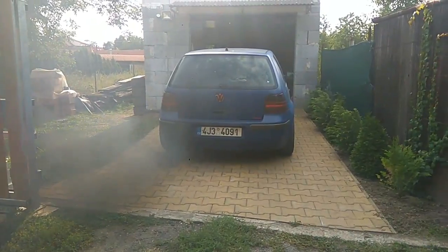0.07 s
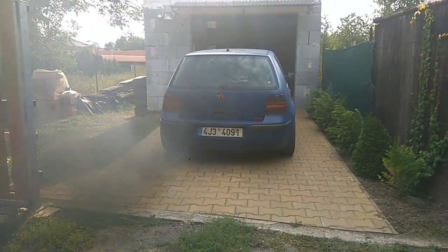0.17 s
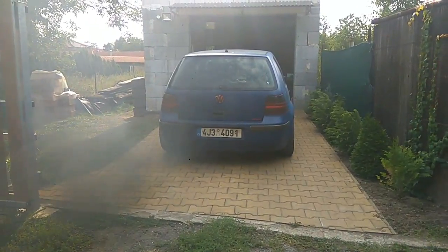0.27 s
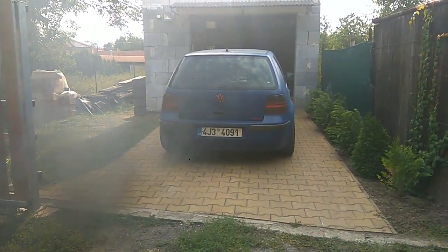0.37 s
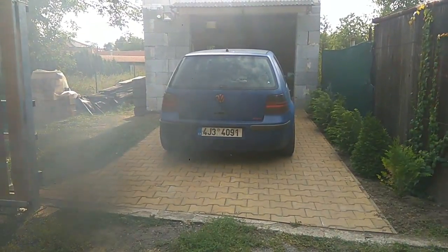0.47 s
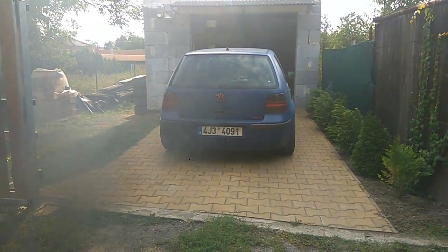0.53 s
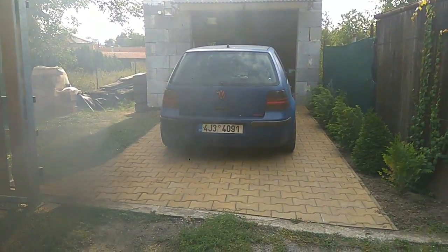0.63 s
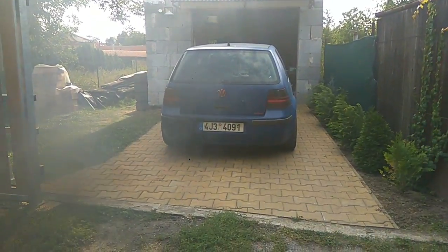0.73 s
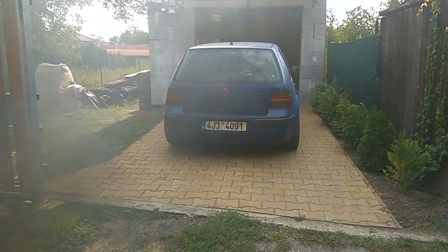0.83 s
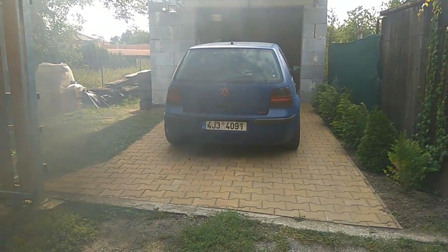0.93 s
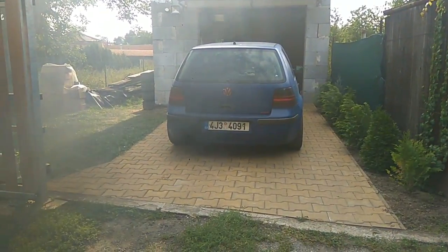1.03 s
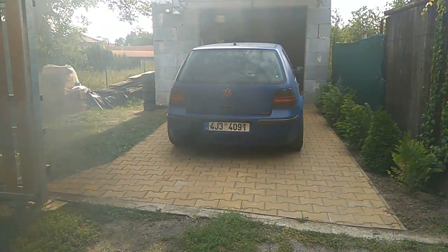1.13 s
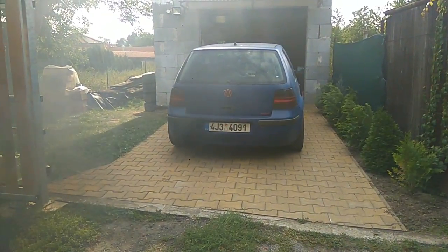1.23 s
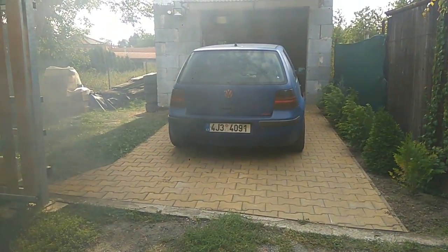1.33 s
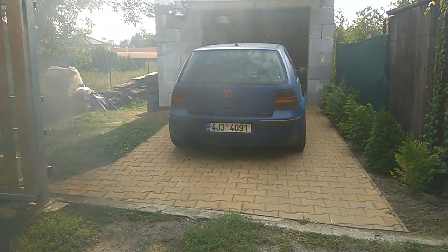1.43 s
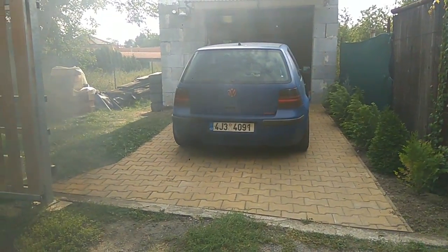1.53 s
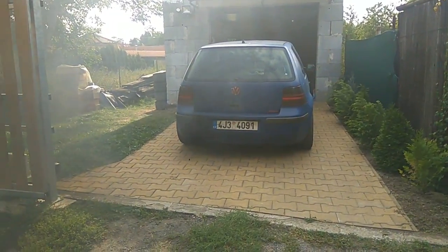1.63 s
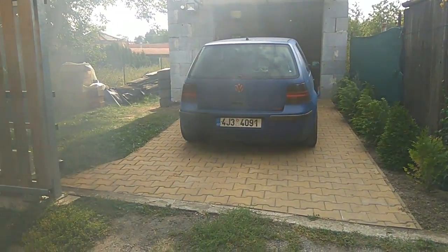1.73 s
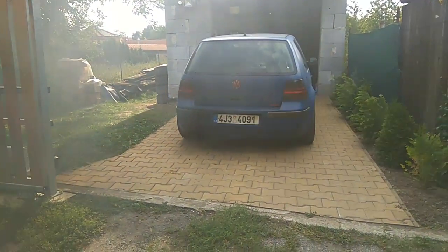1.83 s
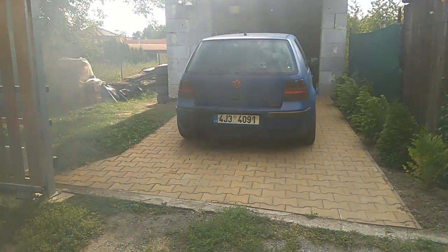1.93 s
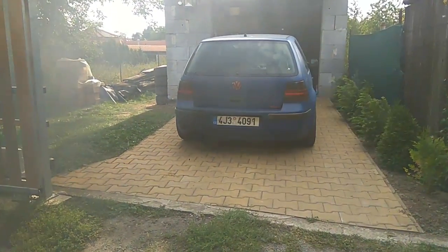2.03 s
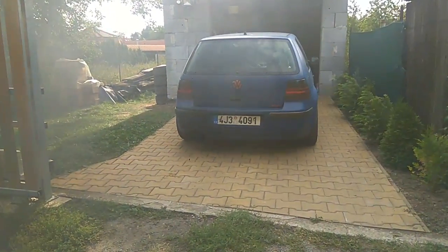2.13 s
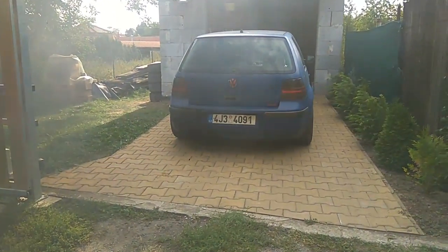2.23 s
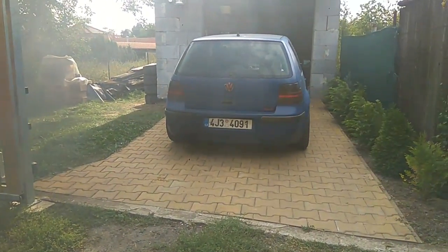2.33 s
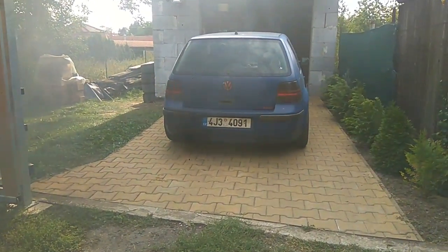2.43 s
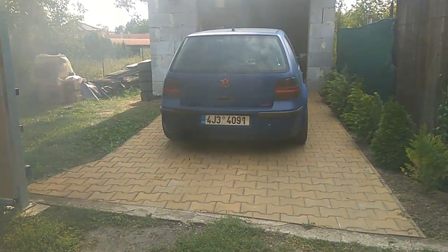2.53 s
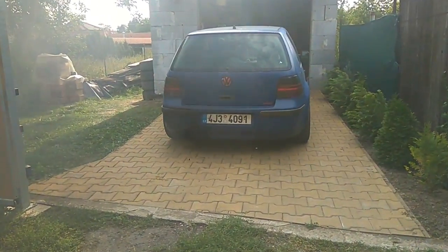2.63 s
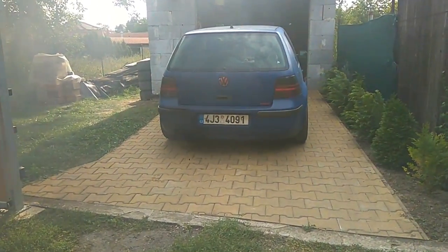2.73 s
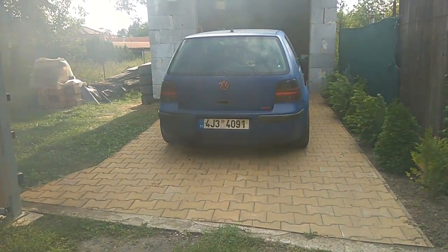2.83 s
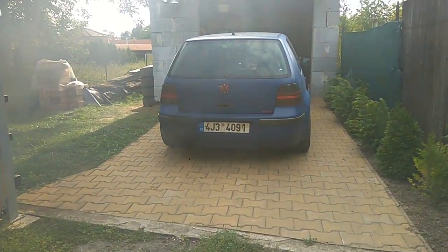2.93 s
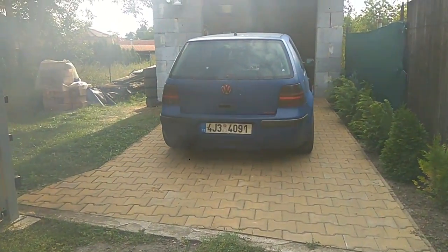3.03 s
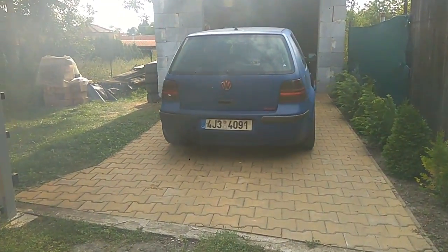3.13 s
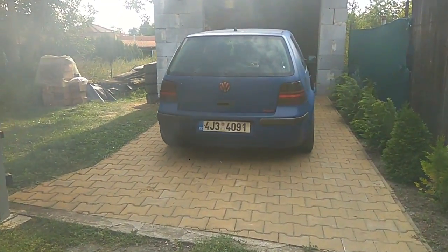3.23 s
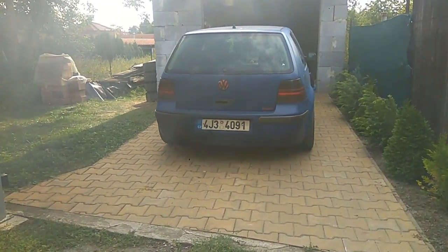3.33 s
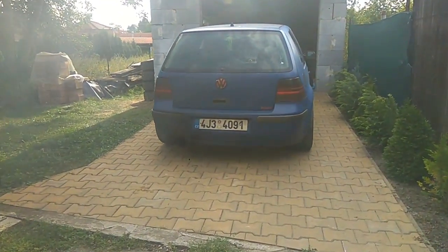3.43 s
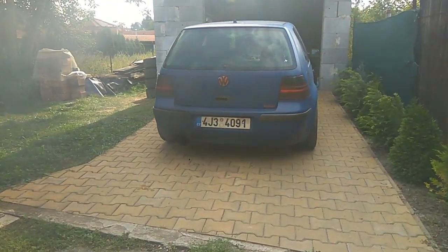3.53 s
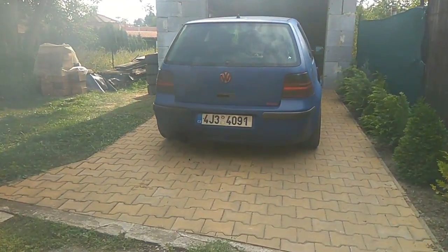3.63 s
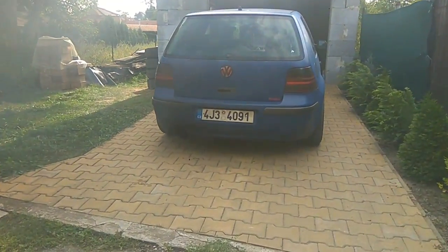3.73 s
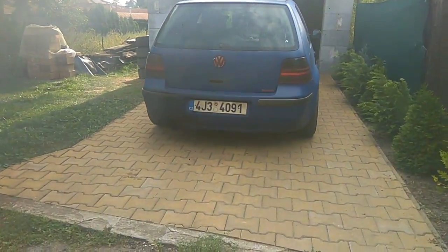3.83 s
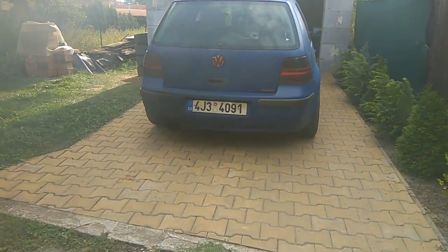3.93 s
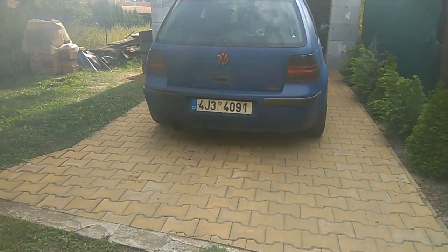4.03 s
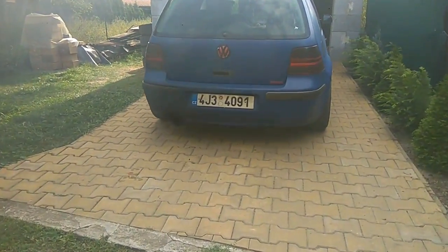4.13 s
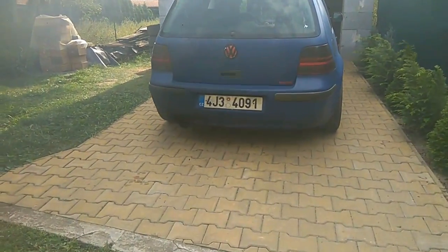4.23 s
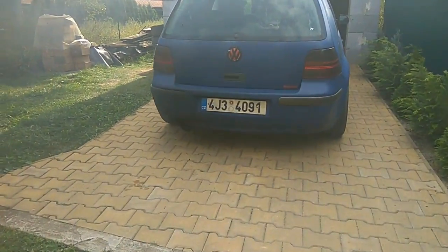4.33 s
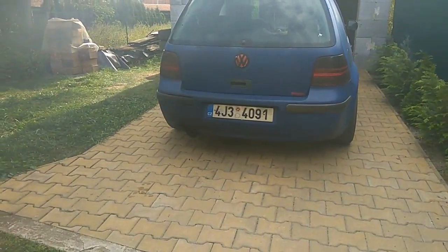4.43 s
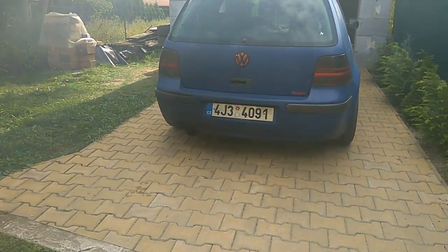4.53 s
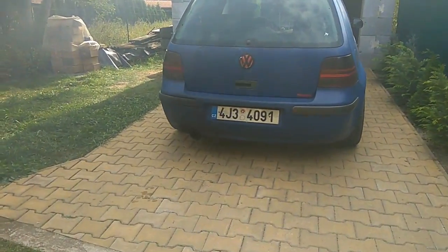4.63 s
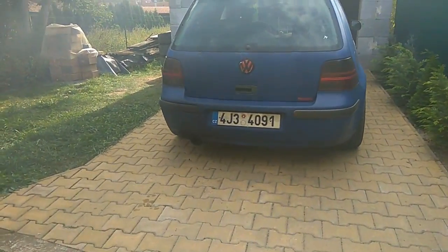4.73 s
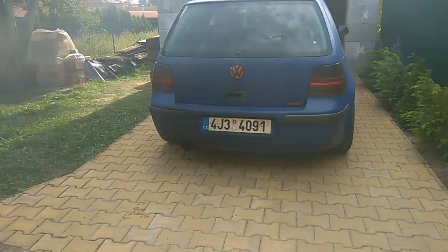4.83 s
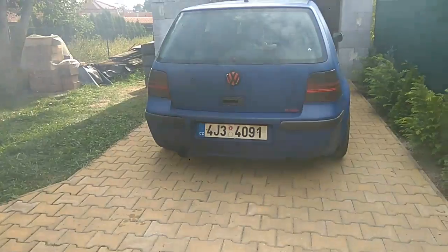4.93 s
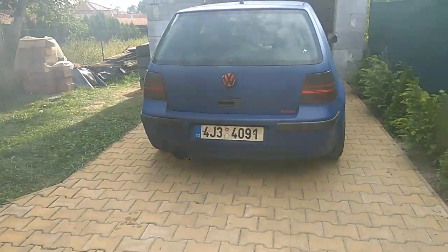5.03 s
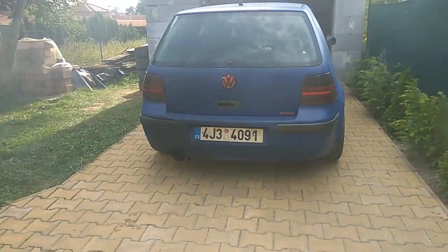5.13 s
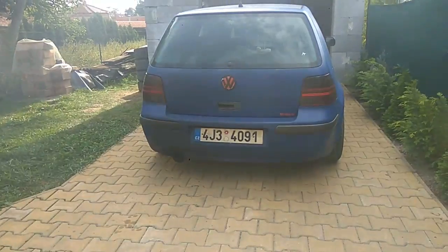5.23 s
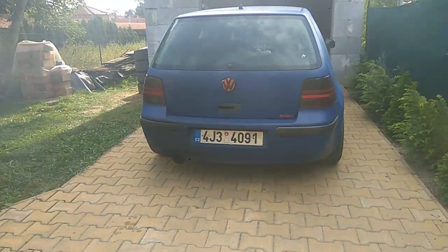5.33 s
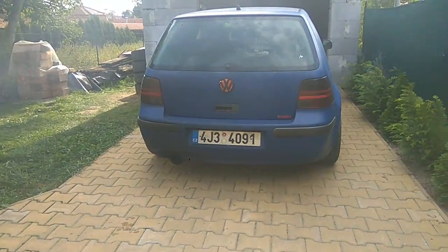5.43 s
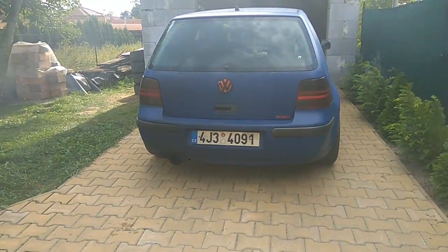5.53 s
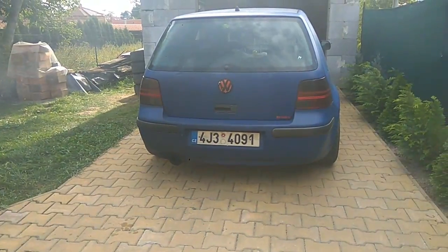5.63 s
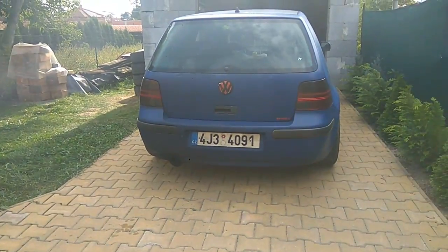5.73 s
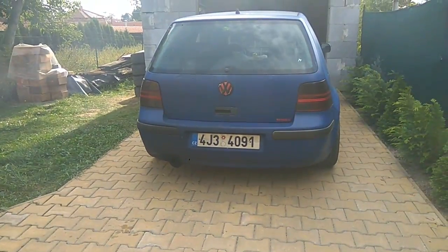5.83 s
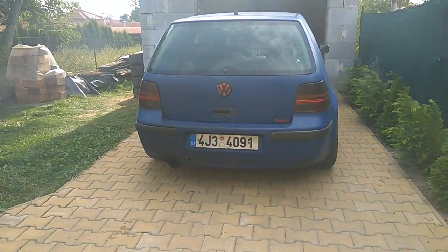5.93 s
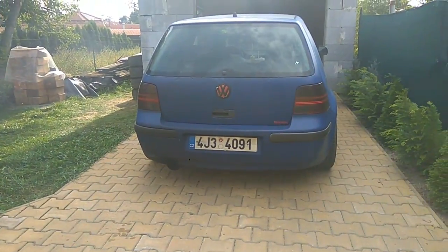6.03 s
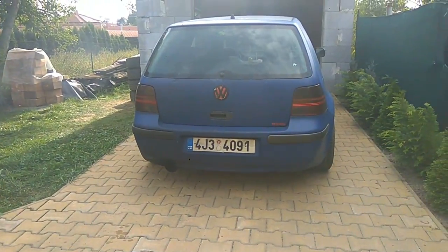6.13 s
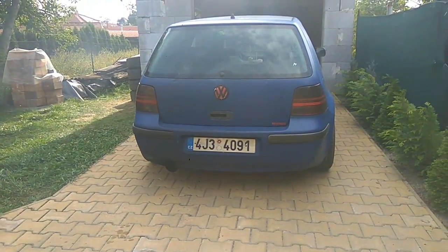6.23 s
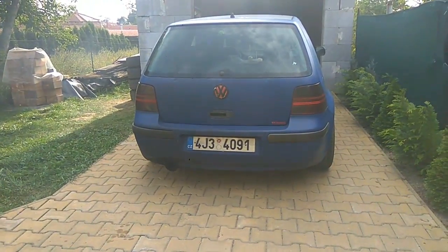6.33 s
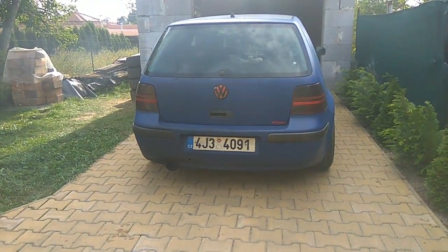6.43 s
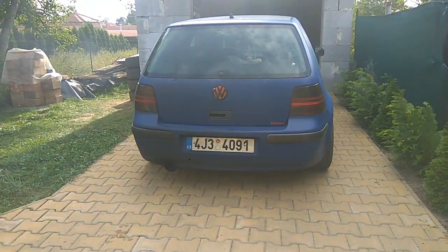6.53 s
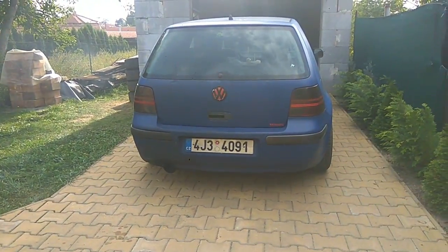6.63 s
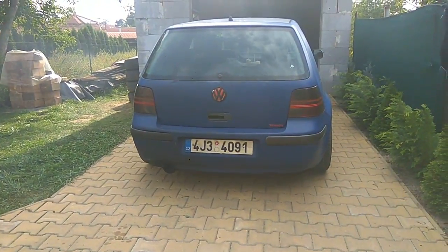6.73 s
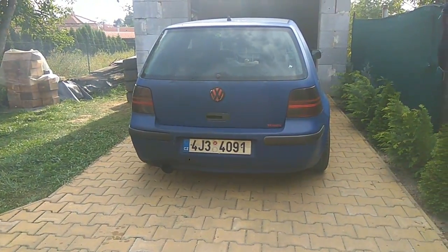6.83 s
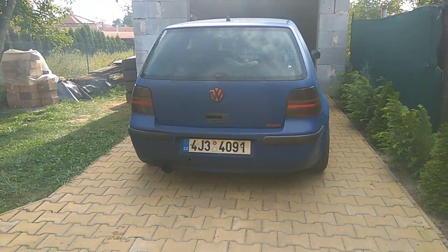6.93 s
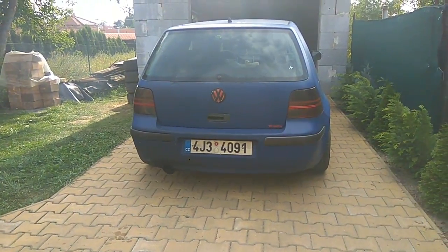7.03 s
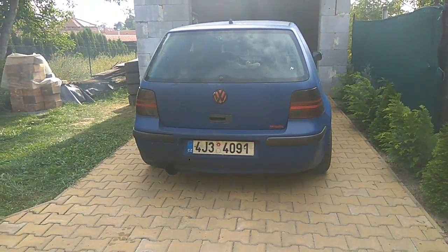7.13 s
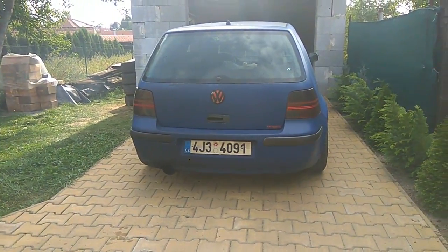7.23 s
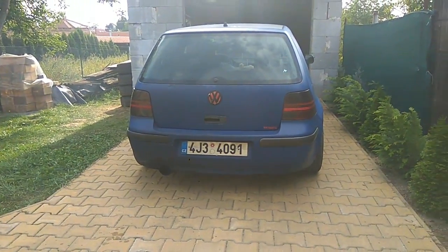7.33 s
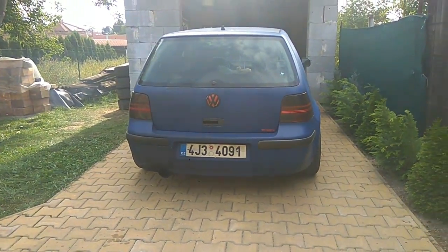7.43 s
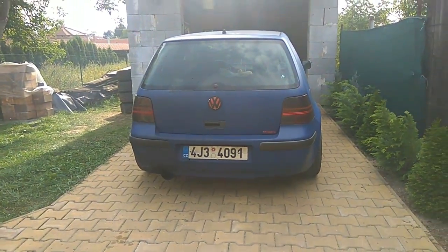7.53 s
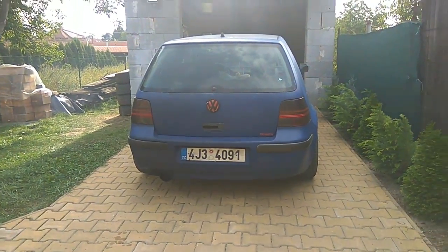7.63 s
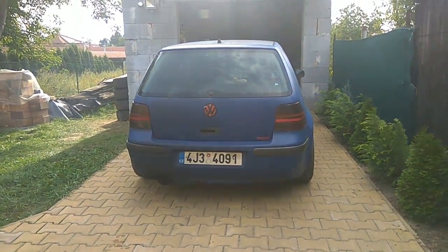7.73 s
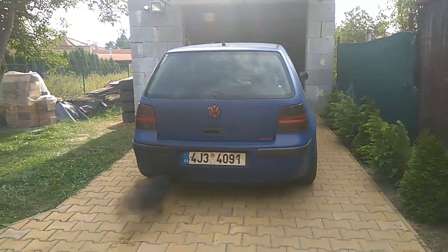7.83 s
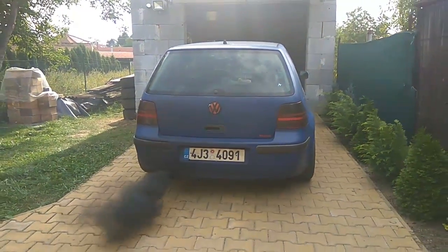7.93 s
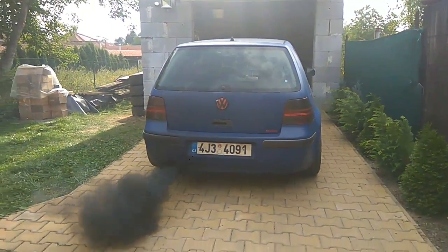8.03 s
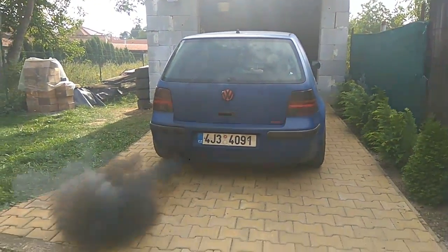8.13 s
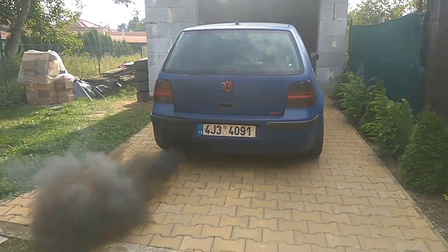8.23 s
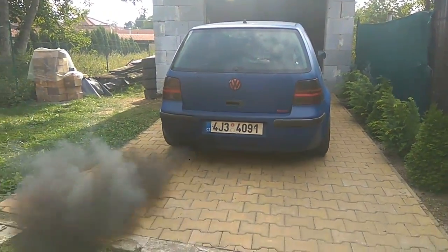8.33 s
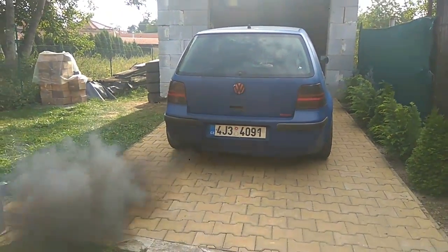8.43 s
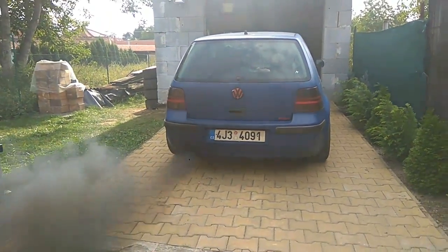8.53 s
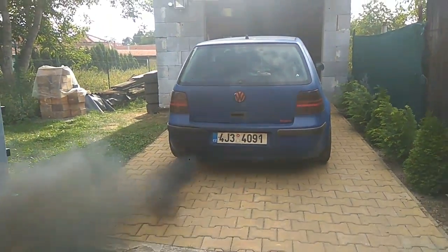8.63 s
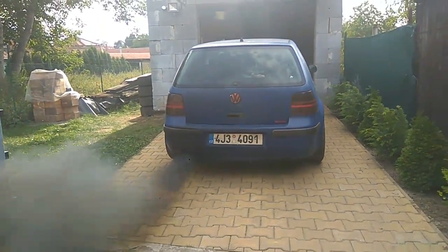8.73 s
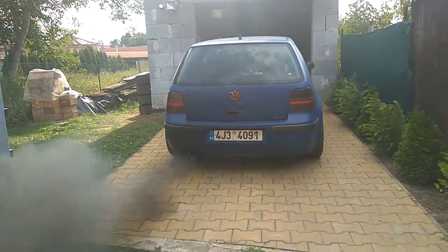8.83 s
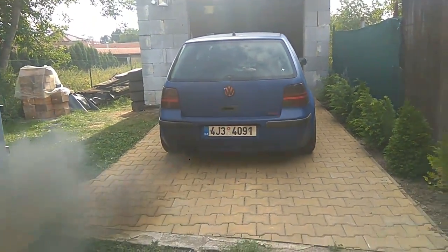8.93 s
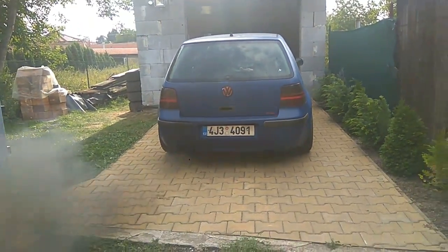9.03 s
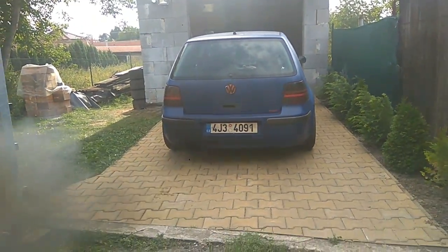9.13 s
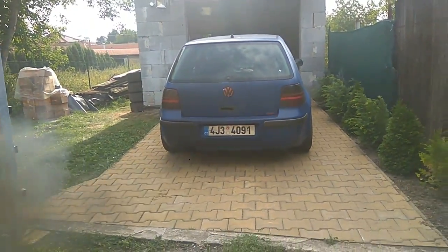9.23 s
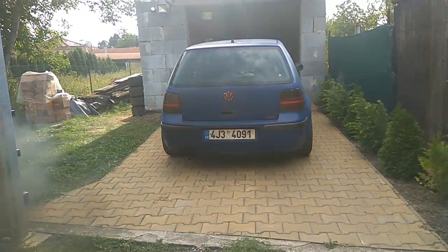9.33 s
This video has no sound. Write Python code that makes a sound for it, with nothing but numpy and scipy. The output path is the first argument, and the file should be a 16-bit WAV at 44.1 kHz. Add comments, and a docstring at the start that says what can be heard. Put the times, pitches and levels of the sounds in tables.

```python
"""A four-cylinder turbodiesel drops from a rev to idle, then is revved twice, heard from behind.
Firing pulses sound the tailpipe as low tones and chop its gas noise into burble, rasp and hiss.
The block knocks at idle; the turbo whistle winds down, flares briefly and spools up.
Someone steps about on the paved drive, something ticks once, and the loudest blasts clip."""
import sys
import numpy as np
from scipy import signal
from scipy.fft import rfft, irfft
from scipy.io import wavfile
from scipy.ndimage import uniform_filter1d

SR = 44100
rng = np.random.default_rng(int(sys.argv[2]) if len(sys.argv) > 2 else 0)


def wav_out(sig):
    """Save sig, one row per channel (or a flat mono array), as 16-bit PCM at SR to the path in sys.argv[1]."""
    wavfile.write(sys.argv[1], SR, np.round(np.clip(np.atleast_2d(sig).T, -1, 1) * 32767).astype(np.int16))


N = 413658
T = np.arange(N) / SR


def amp(db):
    """Decibels to gain."""
    return 10 ** (np.asarray(db) / 20)


def unit_rms(x):
    """Scales to rms 1."""
    return x / np.sqrt(np.mean(x ** 2) + 1e-20)


def at_hz(points, hz):
    """Interpolates a table on a log-frequency axis."""
    f, value = np.transpose(points)
    return np.interp(np.log(hz + 1), np.log(f + 1), value)


def curves(rows):
    """One sampled curve per column after time."""
    times, *columns = np.transpose(rows)
    return [np.interp(T, times, column) for column in columns]


def wander(hz):
    """Random drift, rms about 1."""
    knots = rng.standard_normal(int(T[-1] * 60) + 2)
    return np.interp(T * min(hz, 60), np.arange(len(knots)), knots) * np.sqrt(1.5)


def lowpass(x, hz):
    """Steep stereo band limit."""
    taps = signal.firwin(401, hz, window=("kaiser", 9), fs=SR)
    return signal.oaconvolve(x, taps[None], "same")


def resonate(x, hz, width_hz):
    """Fixed or moving resonance, double pole for steep skirts; rms 1."""
    carrier = np.exp(2j * np.pi * np.cumsum(np.broadcast_to(hz, N)) / SR)
    r = np.exp(-np.pi * width_hz / SR)
    return unit_rms((carrier * signal.lfilter([1], [1, -2 * r, r * r], x / carrier)).real)


def patchy(x, depth_db):
    """Resonances come and go in random time-frequency patches; rms 1."""
    spectra = signal.stft(x, nperseg=512)[2]
    patches = uniform_filter1d(rng.standard_normal(spectra.shape[1:]), size=4, axis=0)
    patches = unit_rms(uniform_filter1d(patches, size=14, axis=1))
    return unit_rms(signal.istft(spectra * amp(depth_db * patches), nperseg=512)[1][:, :N])


# Pipe, body and paving resonances: (frequency [Hz], width [Hz], lift [dB])
MODES = [(481, 10, 7.5), (691, 56, 5), (827, 38, 10.5), (958, 18, 6.5), (1020, 12, -1), (1089, 5.8, 3.5),
         (1359, 41, 9), (1447, 19, 7), (1978, 160, -1), (2031, 240, 8), (2510, 5.7, 6.5), (2754, 54, 5),
         (3620, 19, 8), (4900, 30, 9)]
# Channel likeness: (frequency [Hz], correlation [0..1])
COHERENCE = [(30, .95), (100, 1), (500, .97), (1000, .82), (2000, .9), (4000, .6), (7000, .65)]
# Channel phase: (frequency [Hz], left lead [rad])
LEFT_LEAD = [(0, 0), (860, -0.1), (1290, 0.7), (1810, -0.5), (2670, -0.5), (3190, -1.9), (3620, -5.8),
             (4820, -7.3), (5940, -13.9), (6200, -13.6), (6800, -15.9)]
# Channel balance: (frequency [Hz], left over right [dB])
BALANCE = [(60, -10.5), (92, -5), (140, -1), (220, -2), (330, 5.5), (510, -1), (780, -1), (1190, -2.5),
           (1830, 1.5), (2810, 5), (4300, -11), (6600, 4.5)]


def stereo(pair, spectrum):
    """Two noises, partly correlated, coloured by a spectrum and the resonances; rms 1."""
    hz = np.fft.rfftfreq(N, 1 / SR)
    coherence = np.clip(at_hz(COHERENCE, hz), 0, 1)
    pan = amp(at_hz(BALANCE, hz) / 2) * np.exp(.5j * at_hz(LEFT_LEAD, hz))
    left = rfft(pair[0])
    right = coherence * left + np.sqrt(1 - coherence ** 2) * rfft(pair[1])
    lift_db = sum(db / (1 + (2 * (hz - f) / width) ** 2) for f, width, db in MODES)
    colour = amp(at_hz(spectrum, hz) + lift_db) * (hz > spectrum[0][0]) * (hz < spectrum[-1][0])
    return unit_rms(irfft(np.array([left * pan, right / pan]) * colour, N))


# High tick: (time [s], start pitch [Hz], end pitch [Hz], length [s], level [dB])
TICK = [(6.2435, 5190, 4050, 0.0055, -40)]


def tick():
    """A short falling chirp."""
    out = np.zeros(N)
    for start, start_hz, end_hz, length, db in TICK:
        progress = np.clip((T - start) / length, 0, 1)
        hz = start_hz + (end_hz - start_hz) * progress
        out += amp(db) * np.sin(np.pi * progress) * np.sin(2 * np.pi * np.cumsum(hz) / SR)
    return out


# Shoe landings: (time [s], relative click level [dB], thump level [dB])
FOOTFALLS = [(4.021, -19, -25), (4.1469, -17.5, -15), (4.3466, -29, -29), (4.4355, -21, -22),
             (4.4637, -40, -28), (4.6785, -15.5, -19), (4.782, -6, -11.5), (5.0404, -11, -9.5),
             (5.0665, -10, -13), (6.2185, -18.5, -34), (6.553, -20.5, -22.5), (7.152, -14, -17.5),
             (7.209, -21, -38), (7.3698, -17, -23), (7.398, -13.5, -16), (7.6267, -16, -21)]
# Click spectrum: (frequency [Hz], relative density [dB])
GRIT_SPECTRUM = [(160, -53.5), (280, -5.5), (474, -13), (760, -12), (836, -30.5), (1250, -19), (1730, 2),
                 (2010, 20.5), (2630, -24.5), (3090, -14), (4520, -42), (5170, -7.5), (7050, -46.5),
                 (9160, -65.5), (15500, -120)]
# Sole drags: (time [s], length [s], level [dB])
DRAGS = [(4.255, 0.099, -33), (4.439, 0.047, -43), (4.729, 0.089, -34.5), (5.024, 0.074, -33.5),
         (7.104, 0.113, -47), (7.371, 0.088, -52)]
# Drag spectrum: (frequency [Hz], relative density [dB])
DRAG_SPECTRUM = [(160, -36.5), (280, -10), (701, -2), (882, -2.5), (1250, -14.5), (1980, -5.5),
                 (3090, -15.5), (3690, -22.5), (7050, -25), (9160, -60.5), (15500, -120)]


def footsteps():
    """Shoes land with a thump under a gritty click; dragging soles give longer, duller bursts."""
    grit = stereo(rng.standard_normal((2, N)), GRIT_SPECTRUM)
    age = np.arange(4000) / SR
    attack = np.minimum(age / .002, 1)
    click = attack * (np.exp(-age / .0039) + .32 * np.exp(-age / .024))
    thump = attack * np.sin(2 * np.pi * 150 * age) * np.exp(-age / .0085)
    force, thumps, drag = np.zeros((3, N))
    for start, click_db, thump_db in FOOTFALLS:
        span = slice(round(start * SR), round(start * SR) + len(age))
        force[span] += amp(click_db - 14) * click
        thumps[span] += amp(thump_db) * thump
    for start, length, db in DRAGS:
        arch = np.sin(np.pi * np.clip((T - start) / length, 0, 1))
        drag += amp(db + 2 * wander(60)) * np.sqrt(arch + 1e-12)
    scrape = (drag + .6 * force) * stereo(rng.standard_normal((2, N)), DRAG_SPECTRUM)
    thumps = signal.sosfilt(signal.butter(3, 65, "high", fs=SR, output="sos"), thumps)
    return force * grit + scrape + thumps


# Turbo whistle, three phases: (time [s], pitch [Hz], level [dB], left over right [dB])
TURBO_DOWN = [(1.5, 7730, -107, -5.5), (1.67, 7105, -71, -3), (1.83, 6535, -70, 26), (2.4, 5563, -48.5, -7),
              (2.75, 5190, -56.5, -17), (3.1, 4892, -73, -6), (3.78, 4760, -81, 15), (4.12, 4805, -74, 5),
              (4.51, 4630, -67, -10), (4.75, 4920, -65, -15)]
TURBO_FLARE = [(5.12, 5180, -61, -13), (5.21, 5100, -48.5, -18), (5.36, 5010, -54.5, -20),
               (5.44, 5100, -68, -12)]
TURBO_UP = [(7.7, 5020, -63, 0.0035), (7.736, 5240, -53, 0), (7.878, 7740, -37.5, 0), (7.9, 7646, -85, 0)]


def turbo(firings):
    """An airy whistle that dips once per firing as the pulse loads the wheel."""
    throb = unit_rms(1 - .85 * np.exp(3 * (np.cos(2 * np.pi * firings + 2.25) - 1)))
    out = np.zeros((2, N))
    for rows, tone_share, width_hz in (TURBO_DOWN, .7, 120), (TURBO_FLARE, .5, 130), (TURBO_UP, .2, 350):
        hz, db, pan_db = curves(rows)
        gate = uniform_filter1d(1. * (T > rows[0][0]) * (T < rows[-1][0]), size=800)
        tone = np.sqrt(2) * np.sin(2 * np.pi * np.cumsum(hz) / SR)
        air = resonate(rng.standard_normal(N), hz, width_hz)
        whistle = np.sqrt(tone_share) * tone + np.sqrt(1 - tone_share) * air
        out += amp(db) * gate * throb * whistle * amp([pan_db / 2, -pan_db / 2])
    return out


def knock(impulses, firing_hz):
    """The block rings after each burn; stands out only at idle."""
    ring = resonate(impulses * amp(5 * wander(60)), 2040 + 120 * wander(30), width_hz=300)
    return .3 * ring * np.minimum(31 / firing_hz, 1) ** 4


# Gas blasts: (time [s], relative level [dB], ring [Hz], decay [s])
THROTTLE_BLASTS = [(0.0954, -11, 1950, 0.027), (7.7064, -11, 2060, 0.0076), (7.7595, -15.5, 1970, 0.04),
                   (8.526, 2.5, 1930, 0.0074), (8.804, 5, 2275, 0.02)]


def blasts(rasp):
    """Sudden ringing bursts of gas as the throttle opens or shuts."""
    out = np.zeros((2, N))
    for start, db, ring_hz, decay in THROTTLE_BLASTS:
        burst = resonate(rng.standard_normal(N), ring_hz, width_hz=180) + .39 * rasp
        out += amp(db - 11.5) * (T > start) * np.exp(-abs(T - start) / decay) * burst
    return out


# Pedal presses: (open [s], shut [s], chuff [dB], burble jump [Hz], jump decay [s])
PEDAL = [(-.2, 0.087, 5, 288, 0.21), (7.702, 8.207, -3.5, 131, 0.38), (8.51, 8.804, 0.5, 225, 0.33)]
OPEN_S, SHUT_S, CHUFF_S, LULL_S = .016, .055, .093, .024
COAST_FROM_HZ, COAST_RAMP_HZ, SLOW_BELOW_HZ = 33.2, 18, 80


def throttle(firing_hz, shut_db):
    """Opening and gas settings: brighter under load, a lull then a chuff on shutting, dull coasting."""
    opened, pressed, chuff_db, jump_hz, lull_db = np.zeros((5, N))
    for start, shut, db, up_hz, sink_s in PEDAL:
        since_shut = np.maximum(T - shut, 0)
        pressed += (T > start) * (T < shut)
        opened += np.clip((T - start) / OPEN_S, 0, 1) * np.exp(-since_shut / SHUT_S)
        chuff_db += db * (T > shut) * np.exp(-since_shut / CHUFF_S)
        lull_db -= 7 * np.sin(np.pi * np.clip((shut - T) / LULL_S, 0, 1))
        jump_hz += up_hz * (T > shut) * np.exp(-since_shut / sink_s)
    above_idle_hz, below_slow_hz = firing_hz - COAST_FROM_HZ, SLOW_BELOW_HZ - firing_hz
    coast = uniform_filter1d(1 - pressed, size=600) * np.clip(above_idle_hz / COAST_RAMP_HZ, 0, 1)
    slow_coast = coast * np.clip(below_slow_hz / 6, 0, 1)
    mid_speed = np.clip(np.minimum(above_idle_hz, below_slow_hz) / COAST_RAMP_HZ, 0, 1)
    base_db = shut_db + lull_db
    burble_db = base_db - 3 + 6 * (1 - coast) * opened + 10 * coast + 2 * mid_speed + chuff_db
    # Higher mode when coasting slowly, lower under load.
    burble_hz = 641 + 139 * slow_coast + uniform_filter1d(jump_hz - 49 * pressed, size=600)
    rasp_db = base_db + 6 * opened
    hiss_db = rasp_db - 13 + 3.5 * opened - coast
    return opened, (burble_db, burble_hz, rasp_db, hiss_db)


def puffs(firings, steady=1, decay_cycles=.3, spread_db=2):
    """Gas leaves in one decaying puff per firing, each of its own strength."""
    strength = amp(spread_db * rng.standard_normal(2000))[firings.astype(int)]
    flow = steady + strength * np.exp(-(firings % 1) / decay_cycles)
    return unit_rms(uniform_filter1d(flow, size=180))


# Gas noise, low to high band: (frequency [Hz], relative density [dB])
BURBLE_SPECTRUM = [(140, -36.5), (240, -0.5), (306, -5), (329, -12.5), (534, -2.5), (593, -4.5),
                   (807, -8.5), (879, -7.5), (1000, -21.5), (1150, -16.5), (1500, -17.5), (2530, -120)]
RASP_SPECTRUM = [(620, -24), (1050, -3), (1230, -6.5), (1470, -5), (1560, 1), (1680, -9), (1880, 4.5),
                 (1990, 0.5), (2230, -8), (2350, 0.5), (2440, -7.5), (2550, -0.5), (2860, -12),
                 (3010, -21.5), (3200, -8), (4160, -42), (7040, -120)]
HISS_SPECTRUM = [(1760, -46), (3000, 1), (3550, -3), (3720, -20), (3800, -5), (4240, -8), (4480, -8),
                 (4830, -6), (5260, -5), (5980, -11), (6330, -10), (6630, -12), (7050, -16), (9160, -56),
                 (15500, -120)]


def gas_noise(firings, firing_hz, burble_db, burble_hz, rasp_db, hiss_db):
    """Turbulent puffs with knock and blasts; at speed the gas also rings pipe modes."""
    noise = rng.standard_normal((8, N))
    impulses = np.diff(firings.astype(int), prepend=0)
    kicks = unit_rms(impulses * amp(3 * wander(60)))
    growl = .7 * kicks * np.clip((firing_hz - 40) / 30, 0, 1)  # gives the revs their pitch
    broad = stereo(noise[:2] * puffs(firings) + growl, BURBLE_SPECTRUM)
    drive = noise[6] * puffs(firings, steady=.3, decay_cycles=.2, spread_db=3) + .6 * kicks
    mode = resonate(drive, burble_hz, width_hz=190)
    mode = np.array([mode, np.roll(mode, -3)])
    # The mode takes over as flow grows.
    mode_share = np.clip(np.maximum((burble_db + 40) / 26, (firing_hz - 35) / 90), 0, .8)
    burble = amp(burble_db) * (np.sqrt(1 - mode_share) * broad + np.sqrt(mode_share) * mode)
    block = knock(impulses, firing_hz)
    rasp = patchy(stereo(noise[2:4] * puffs(firings), RASP_SPECTRUM), depth_db=2.5) + block
    upper_mode = resonate(noise[7], 2380, width_hz=290) * np.clip((firing_hz - 112) / 22, 0, 1)
    mids = amp(rasp_db + .17 * wander(22)) * (rasp + .88 * upper_mode) + blasts(rasp)
    hiss_gain = amp(hiss_db + 1.2 * wander(20)) * puffs(firings, steady=2)
    return burble + mids + hiss_gain * stereo(noise[4:6], HISS_SPECTRUM)


# Pipe response for the drone: (frequency [Hz], relative gain [dB])
DRONE_RESPONSE = [(24, -72.5), (40, -1), (70, 2.5), (95, -31.5), (113, -43.5), (135, 3.5), (172, -7.5),
                  (195, 2.5), (215, -7), (265, -39), (307, -24.5), (328, -20), (420, -37.5), (550, -63),
                  (920, -120)]
# Pipe rumble: (frequency [Hz], relative density [dB])
RUMBLE_SPECTRUM = [(15, -33.5), (30, -30.5), (60, -17.5), (150, 1.5), (260, -4)]
PIPE_HZ = 170
LEAD_ORDERS = (1, 1.5, 2, 3, 5)  # multiples of the firing rate


def pipe_drone(firings, firing_hz, level_db):
    """Wavering minor orders over rumble; both yield to the lead orders at speed."""
    drone, power = np.zeros((2, N))
    for order in np.arange(1, 15, .5):
        hz, is_half = order * firing_hz, order % 1 > 0
        gain = amp(at_hz(DRONE_RESPONSE, hz) - 10 * is_half) * (hz < DRONE_RESPONSE[-1][0])
        power += gain ** 2 / 2
        if order not in LEAD_ORDERS:
            lag = 3 * np.arctan((hz - PIPE_HZ) / 40) + 1.1 * wander(7)  # the pipe rings on
            lag += is_half * 2 * np.pi * rng.random()
            drone += gain * amp(2.5 * wander(4)) * np.cos(2 * np.pi * order * firings - lag)
    octaves = np.log2(firing_hz / 30)
    rumble = amp(-9 - 2.1 * octaves) * stereo(rng.standard_normal((2, N)), RUMBLE_SPECTRUM)
    return amp(level_db - 5.14 * octaves) * (drone / np.sqrt(power) + rumble)


# Pipe and yard response for the lead orders: (frequency [Hz], gain [dB])
LEAD_RESPONSE = [(30.0, -37), (45.0, -14.5), (60.0, -11.5), (70.0, 0), (80.0, 1.5), (92.0, -8.5),
                 (100.0, -8.5), (107.0, 1.5), (119.0, -3.5), (130.0, -6.5), (145.0, 2), (160.0, 2.7),
                 (175.0, 3.5), (185.0, -0.8), (193.0, -4.5), (202.0, 1), (212.0, -4), (225.0, -4.5),
                 (240.0, -14.5), (265.0, -13.5), (300.0, -23), (350.0, -22.5), (500.0, -18), (650.0, -8)]
# Brief dips and swells: (time [s], half width [s], first order [dB], higher orders [dB])
SWELLS = [(.06, 0.036, -18, 0.5), (.11, 0.024, 5, -19), (.44, 0.022, -1, -8.5), (.57, 0.016, -12, 2),
          (.9, .17, 7, -1), (1.0, 0.043, -1, 3), (1.061, .025, 3, -4.5), (1.18, 0.032, 0, -4.5),
          (1.42, 0.055, -3, -0.5), (1.57, .04, -4, -5), (1.8, 0.024, 0, 0), (7.74, 0.036, -3, 1.5),
          (7.8, .06, -8, -4), (8.07, .03, -7, 2), (8.21, 0.011, -13, -20), (8.49, 0.038, -15, 2.5),
          (8.381, 0.12, 1, -15), (8.53, 0.026, 0.5, 2.5), (8.62, 0.044, 4.5, -1.5),
          (8.735, 0.042, -20, 0.5), (8.79, 0.016, 8, 1), (8.87, 0.056, 2, -4), (8.97, .025, -5, -2),
          (9.3, 0.034, 0, -14)]
LEAD_DB, LEAD_OPEN_DB = (-4, -14, 1, 0, 1), (-1.5, -2, 1, 3, 1.5)  # per order: base, open-throttle lift


def tailpipe(firings, firing_hz, tone_db, opened):
    """Firing pulses sound the pipe as tones over a drone; unequal cylinders add weaker half orders."""
    first_db, higher_db = sum(np.outer(dbs, np.exp(-((T - centre) / width) ** 2))
                              for centre, width, *dbs in SWELLS)
    out = pipe_drone(firings, firing_hz, tone_db + 8 + .5 * higher_db)
    for order, base_db, open_db in zip(LEAD_ORDERS, LEAD_DB, LEAD_OPEN_DB):
        hz = order * firing_hz
        swell_db = first_db if order == 1 else higher_db
        db = tone_db + base_db + open_db * opened + at_hz(LEAD_RESPONSE, hz) + swell_db
        lag = 2 * np.arctan((hz - PIPE_HZ) / 60)
        out += amp(db) * np.sqrt(2) * np.cos(2 * np.pi * order * firings - lag)
    return out * amp([[-.2], [.2]])


# Engine speed: (time [s], firing rate [Hz])
FIRING_RATE = [(0, 117.5), (.07, 120.8), (.18, 115.9), (.31, 104.7), (.5, 94.1), (.73, 82.1), (.94, 70.7),
               (1.17, 59.4), (1.54, 44.6), (1.77, 35.4), (2.27, 32.3), (2.8, 30), (3.92, 30.04),
               (4.05, 31.54), (4.8, 30.27), (5.12, 28.45), (5.3, 29.83), (7, 30.09), (7.3, 30.82),
               (7.68, 30.2), (7.81, 56.1), (7.94, 74.7), (8.02, 82.5), (8.12, 98.8), (8.2, 108.4),
               (8.28, 104.8), (8.49, 93.9), (8.62, 112.9), (8.77, 133.3), (8.85, 125.1), (9.01, 114.7),
               (9.38, 93.9)]
# Overall loudness of low tones and rasp; drops suddenly near 0.8 s, swells at idle and with the revs:
# (time [s], tones [dB], shut-throttle rasp [dB])
LEVELS = [(0, -12, -23.5), (.3, -17, -28), (.76, -20, -35), (.84, -30, -42), (1.05, -26, -47.5),
          (1.3, -35, -49), (1.75, -45, -54.5), (1.9, -56.5, -51), (2.3, -53, -51), (2.8, -50, -48),
          (3.9, -46.5, -44), (4.1, -41, -42), (4.7, -36, -43), (4.95, -37, -45.5), (5.15, -33, -45),
          (5.3, -39, -45), (5.45, -46.5, -45.5), (5.8, -51, -46.5), (6.15, -48.5, -44.5),
          (6.3, -43.5, -45.5), (6.45, -52, -48), (6.58, -43, -45), (7.05, -50, -47), (7.2, -38, -45),
          (7.5, -38, -46.5), (7.66, -42, -40.5), (7.74, -24.5, -35.5), (7.95, -20, -29), (8.03, -19, -31),
          (8.19, -17, -24.5), (8.3, -13.5, -25), (8.5, -9, -26.5), (8.58, -12.5, -23), (8.7, -11, -24),
          (8.8, -11, -21), (9, -21.5, -25.5), (9.2, -15, -29), (9.38, -11.5, -31)]


def scene():
    """Tailpipe, gas and turbo share one firing count; steps and tick lie on top."""
    firing_hz, = curves(FIRING_RATE)
    tone_db, shut_db = curves(LEVELS)
    firings = np.cumsum(firing_hz) / SR
    opened, gas_settings = throttle(firing_hz, shut_db)
    tones = tailpipe(firings, firing_hz, tone_db, opened)
    whistle = turbo(firings)
    gas = gas_noise(firings, firing_hz, *gas_settings)
    return tones + whistle + gas + footsteps() + tick()


def record(dry):
    """A narrow-band converter adds a faint mirror image; peaks clip softly; then a band limit."""
    band_hz, mirror_hz, knee, headroom = 7200, 16000, .56, .12
    x = signal.sosfilt(signal.butter(24, band_hz, fs=SR, output="sos"), dry)
    x = x + amp(-17) * lowpass(x * np.cos(2 * np.pi * mirror_hz * T), hz=9780)
    excess = np.maximum(abs(x) - knee, 0)
    clipped = x - np.sign(x) * (excess - headroom * np.tanh(excess / headroom))
    return lowpass(clipped, hz=15800)


dry = scene()
out = record(dry)
wav_out(out)
```